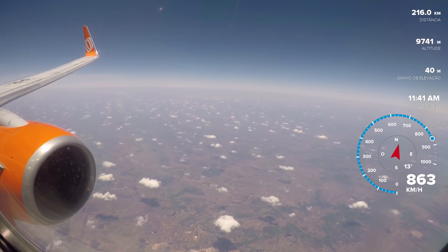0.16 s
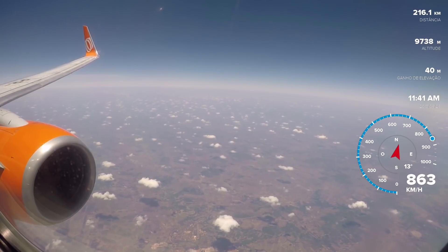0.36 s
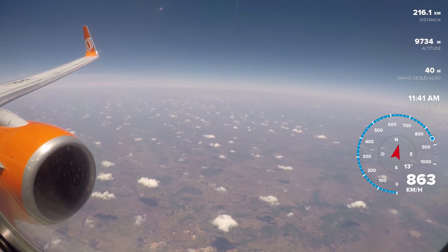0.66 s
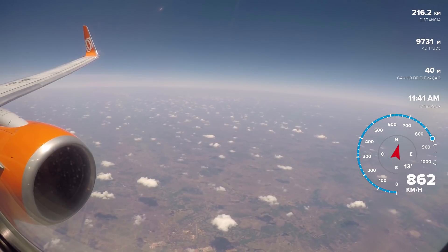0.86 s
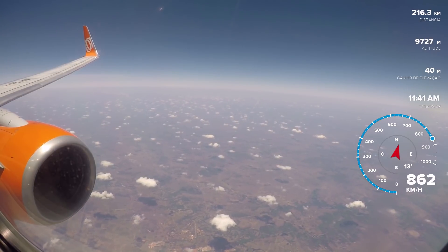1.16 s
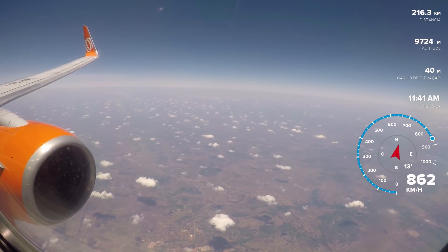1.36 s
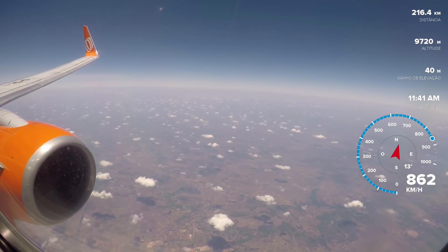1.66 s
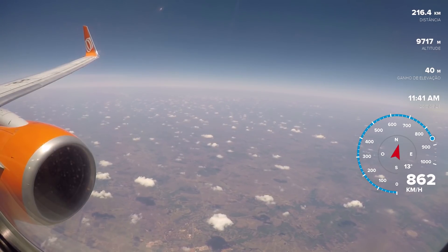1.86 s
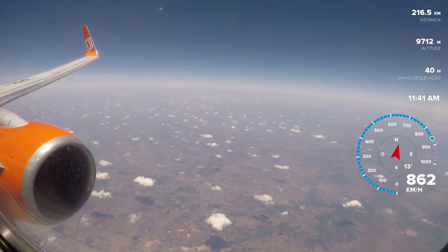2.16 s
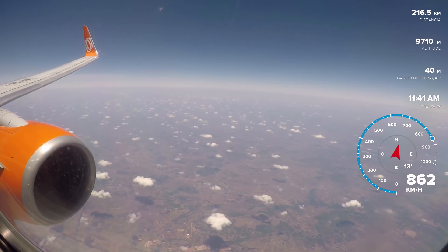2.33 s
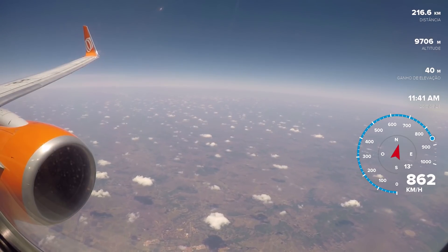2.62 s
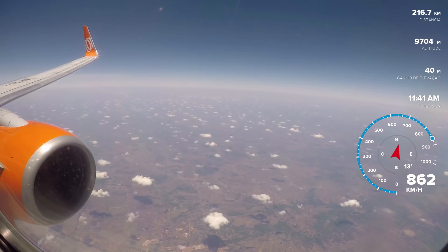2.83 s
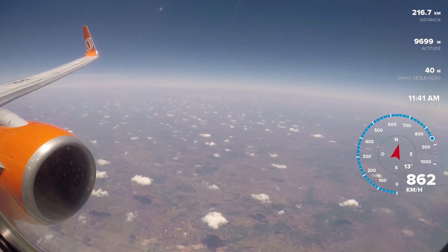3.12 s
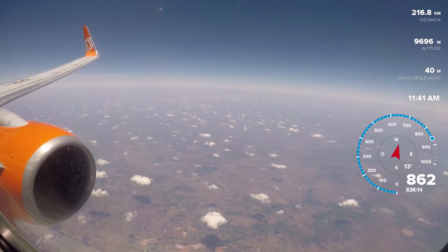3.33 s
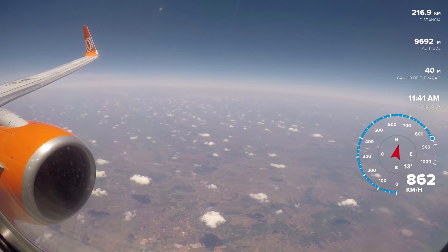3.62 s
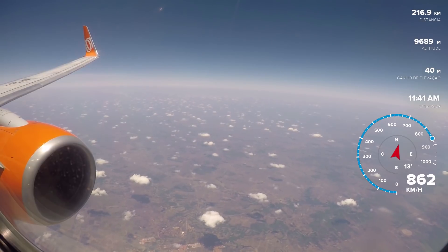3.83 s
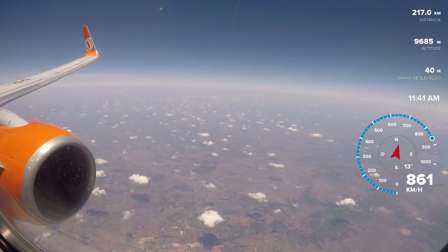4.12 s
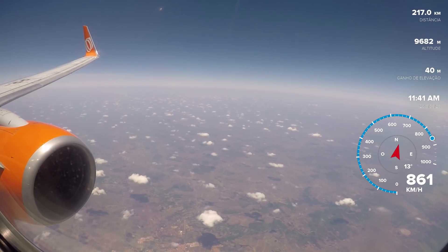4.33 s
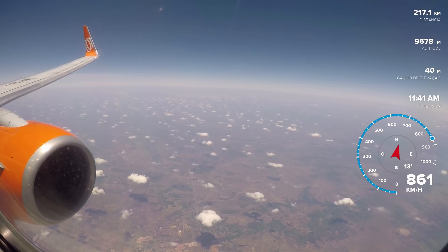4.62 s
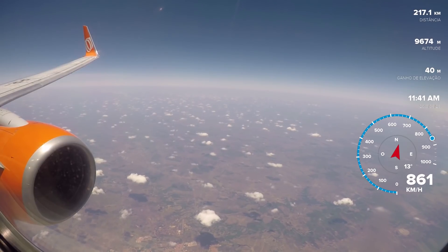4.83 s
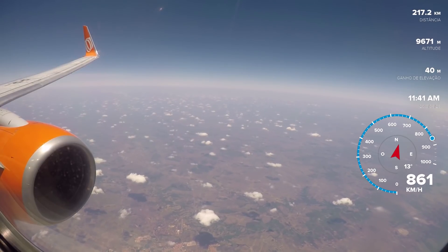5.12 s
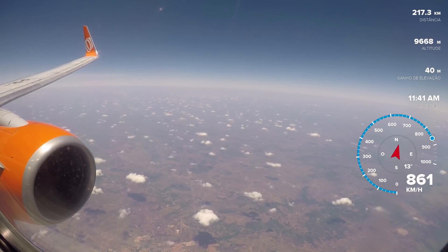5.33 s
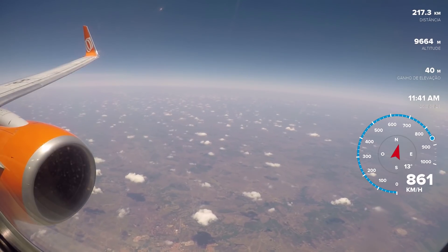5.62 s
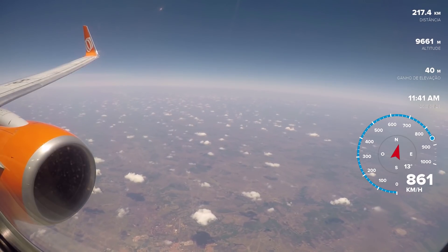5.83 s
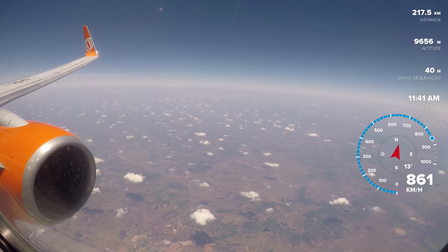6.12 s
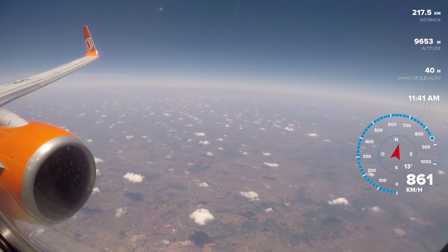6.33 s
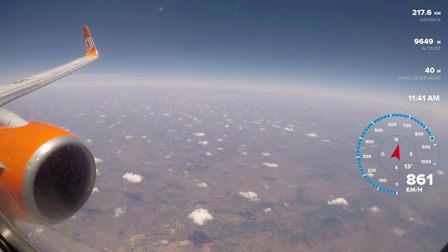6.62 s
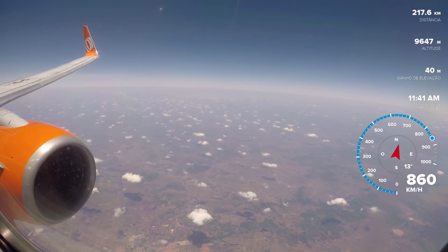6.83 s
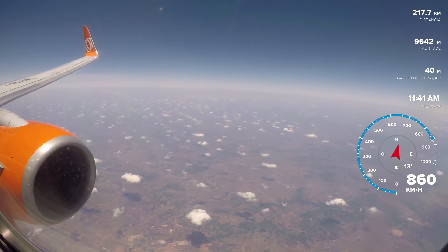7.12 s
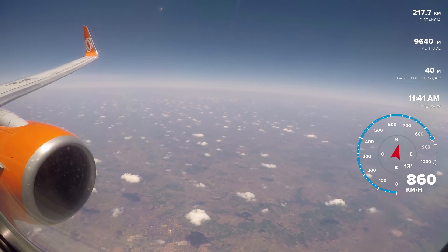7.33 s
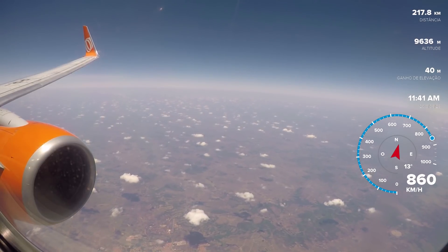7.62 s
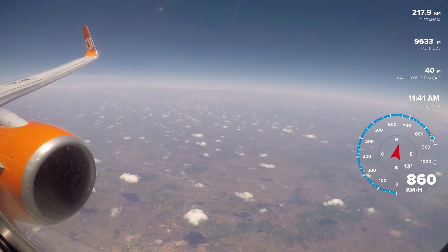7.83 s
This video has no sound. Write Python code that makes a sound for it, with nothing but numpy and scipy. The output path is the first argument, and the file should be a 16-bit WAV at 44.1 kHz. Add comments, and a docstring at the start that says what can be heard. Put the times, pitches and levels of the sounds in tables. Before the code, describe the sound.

Steady rush of air and jet engine drone with a deep hum, heard from a window seat inside a cruising airliner.

```python
"""Turbulent air rushes along the fuselage of a cruising jet airliner, heard from a window seat.
Its pressure fluctuations excite the resonances of the wall panels and the cabin air. Engine vibration
adds a deep steady hum, and engine roar booms in one cabin resonance as a surging drone. Close by, soft
material rustles a few times, a loose fitting clacks, and plastic trim gives one stick-slip squeak."""
import sys
import numpy as np
from scipy import signal
from scipy.fft import rfft, irfft
from scipy.io import wavfile

SR = 44100
rng = np.random.default_rng(int(sys.argv[2]) if len(sys.argv) > 2 else 0)


def log_audio(samples):
    """Write samples as a 16-bit WAV file to the path given in sys.argv[1]."""
    # one column per channel
    frames = np.atleast_2d(samples).T
    # limit to full scale, then quantise
    limited = np.clip(frames, -1, 1)
    pcm = np.round(limited * 32767).astype(np.int16)
    wavfile.write(sys.argv[1], SR, pcm)


N = 351458
TIME = np.arange(N) / SR
BIN_HZ = np.maximum(np.arange(N // 2 + 1) * SR / N, 1)

# Air rush transmitted through the wall. Each row: frequency in Hz, relative spectral density in dB.
RUSH_SPECTRUM = [(12, -55.5), (27, -46), (48, -45), (119, -48.5), (189, -48), (445, -60.5), (683, -61),
                 (853, -71.5), (1357, -68.5), (1962, -76), (2306, -76), (2869, -89.5), (6342, -101.6),
                 (7133, -106.3), (10300, -112.5), (11500, -124)]
# Peaks and dips in the tone colour of the air rush. Each row: frequency in Hz, bandwidth in Hz, lift in dB.
RUSH_PEAKS_AND_DIPS = [(43.6, 3.8, 6.5), (158.4, 11, 4.5), (174, 6.4, 0.5), (252.6, 16, 1.2), (348.5, 16, 6),
                       (382, 44, 3), (458, 23, -1), (510, 56, 3), (594.3, 45.4, 7.5), (710, 39, 1),
                       (743, 24, -3.5), (825, 121, 6), (1035, 130, 4), (2077, 54, 2.5), (2750, 64, 6),
                       (3760, 700, 2.5), (7600, 480, -1), (8400, 760, 3)]
# Harmonics of the hum. Each row: harmonic number, relative level in dB, spread of that level in dB.
HUM_HARMONICS = [(1, 0, .5), (2, -12, 2.5), (3, -21, 2)]
# Pitch contour of the drone. Each row: time in seconds, frequency in Hz.
DRONE_PITCH_CONTOUR = [(0, 144), (.5, 143), (.78, 156), (1.05, 141), (1.65, 145), (2.5, 139), (2.95, 150),
                       (3.55, 144), (3.85, 150), (4.0, 142), (4.35, 142), (5.0, 146), (5.55, 148),
                       (5.8, 140), (6.45, 142), (6.72, 156), (7.05, 141), (7.97, 145)]
# Level contour of the drone. Each row: time in seconds, relative level in dB.
DRONE_LEVEL_CONTOUR = [(0.0, -25), (0.24, -21.5), (0.35, -36), (0.86, -23), (0.98, -35.5), (1.02, -23),
                       (1.18, -33.5), (1.28, -23), (1.97, -29), (2.06, -23.5), (2.31, -29), (2.51, -20.5),
                       (2.57, -33.5), (2.62, -26.5), (3.17, -28), (3.37, -34), (3.4, -21.5), (3.73, -23.5),
                       (3.79, -37.5), (3.88, -21.5), (4.02, -30.5), (4.11, -19.5), (4.28, -27.5),
                       (4.53, -23.5), (4.71, -39.5), (4.73, -27), (5.97, -25), (6.02, -31), (6.17, -24),
                       (6.21, -32.5), (6.35, -21), (6.41, -27.5), (6.57, -22), (6.88, -33), (7.17, -21.5),
                       (7.41, -30), (7.61, -19), (7.81, -37), (7.86, -29), (7.97, -29)]
# Chirps of the squeak. Each row: start in seconds, length in seconds, pitch in Hz, relative level in dB,
# level of the octave above it in dB relative to the fundamental, roughness from 0 to 1.
SQUEAK_CHIRPS = [(6.558, 0.016, 3270, -51, -22, .15), (6.576, 0.017, 3230, -45.5, -17, .1),
                 (6.609, .018, 3250, -49, -22, .15), (6.635, .06, 3050, -57, -12, 1),
                 (6.712, 0.021, 3200, -57, -5, 0.3), (6.736, 0.023, 3200, -50, -8, .1),
                 (6.76, 0.034, 3230, -52.5, -7, .12), (6.794, 0.036, 3220, -53.5, -22, .15),
                 (6.832, .046, 3238, -49, -12, .12), (6.884, 0.03, 3270, -55, -5, .2),
                 (6.922, 0.02, 3350, -52, -13, 0.15), (6.945, .02, 3340, -58, -10, .4)]
# Impacts of the fitting. Each row: start in seconds, level in dB, attack and 1/e decay time in seconds.
FITTING_IMPACTS = [(5.590, -51, .002, .008), (5.597, -46.5, .006, 0.033)]
# Damped modes of the fitting. Each row: frequency in Hz, bandwidth in Hz, relative level in dB.
FITTING_RESONANCES = [(1900, 500, 5), (2600, 700, 5), (3650, 1000, 1), (5600, 900, -3), (6560, 650, -2),
                      (9200, 1000, -9), (11000, 1200, -14)]
# Rubs of soft material. Each row: start in seconds, level in dB, nominal length in seconds,
# centre of the hiss in Hz, bandwidth as a fraction of the centre.
RUSTLE_STROKES = [(0.126, -59, 0.049, 5900, 0.9), (0.578, -58, 0.034, 5500, 0.45),
                  (1.272, -55, .036, 4500, 0.6), (1.836, -55.8, .034, 5300, 1.6),
                  (2.062, -57, .034, 5300, 1.3), (2.954, -57, 0.024, 5300, 0.45),
                  (6.303, -60, .095, 5600, 0.61), (6.653, -58, 0.049, 4200, .8), (7.19, -63, .08, 6000, .9)]


def air_rush(level_db=-22, gust_db=0.25, flicker_db=0.43):
    """Boundary-layer turbulence forces panel and air resonances; each octave flutters as eddies pass."""
    hz, db = np.transpose(RUSH_SPECTRUM)
    spectrum_db = np.interp(np.log(BIN_HZ), np.log(hz), db)
    spectrum_db += sum(lift * resonance(centre, width) for centre, width, lift in RUSH_PEAKS_AND_DIPS)
    low_cut = BIN_HZ / np.hypot(BIN_HZ, 10)
    roar = rfft(noise(undb(spectrum_db) * low_cut))
    octave = np.floor(np.log2(np.maximum(BIN_HZ, 64)))
    rush = 0
    for k in np.unique(octave):
        band = irfft(roar * (octave == k), N)
        rush += band * undb(flicker_db * fluctuation(19))
    return rush * undb(level_db - gust_db * fluctuation(0.86))


def engine_hum(pitch_hz=32.57, fundamental_db=-25.3, drift=0.00079):
    """Forced vibration: the engine shakes the airframe at a nearly constant rate and its harmonics."""
    phase = phase_of(pitch_hz * (1 + drift * fluctuation(0.89)))
    hum = 0
    for k, db, waver_db in HUM_HARMONICS:
        amplitude = undb(db + waver_db * fluctuation(4.5))
        hum += amplitude * np.sin(k * phase + rng.uniform(0, 2 * np.pi))
    return np.sqrt(2) * hum * undb(fundamental_db)


def engine_drone(level_db=-27, wander=0.0252, drift=0.00798, surge_db=1.4, flutter_db=0.86):
    """A narrow cabin resonance filters engine roar into a tone of wandering pitch and surging level."""
    hz = np.interp(TIME, *np.transpose(DRONE_PITCH_CONTOUR))
    hz *= 1 + wander * fluctuation(15.5) + drift * fluctuation(2.75)
    contour_db = np.interp(TIME, *np.transpose(DRONE_LEVEL_CONTOUR))
    swell_db = surge_db * fluctuation(4.8) + flutter_db * fluctuation(15)
    drone = np.sin(phase_of(hz)) * undb(contour_db + swell_db)
    return unit_rms(drone) * undb(level_db)


def squeak(edge_s=0.012, rise_hz_per_s=430, jitter=0.04, gain_db=-0.6, flutter_db=0.5):
    """Stick-slip friction of plastic sounds a tone and its octave in chirps; irregular slip rasps."""
    slip = jitter * fluctuation(400)
    hz = np.full(N, float(SQUEAK_CHIRPS[0][2]))
    tone_envelope, octave_envelope = 0, 0
    for start, length, pitch, db, octave_db, roughness in SQUEAK_CHIRPS:
        age = TIME - start
        chirp_hz = (pitch + rise_hz_per_s * (age - length / 2)) * (1 + roughness * slip)
        takeover = np.clip(age / edge_s + 0.5, 0, 1)  # glide from the previous chirp's pitch
        hz += takeover * (chirp_hz - hz)
        grip = np.clip(np.minimum(age, length - age) / edge_s + 0.5, 0, 1)
        tone_envelope += grip * undb(db)
        octave_envelope += grip * undb(db + octave_db)
    octave_envelope *= undb(1.2 * fluctuation(45))
    phase = phase_of(hz)
    chirps = tone_envelope * np.sin(phase) + octave_envelope * np.sin(2 * phase)
    return np.sqrt(2) * chirps * undb(gain_db + flutter_db * fluctuation(50))


def fitting_clack():
    """Impact excitation: two quick bursts of dense contacts ring a plastic fitting's damped modes."""
    response = sum(undb(db) * resonance(hz, width) for hz, width, db in FITTING_RESONANCES)
    envelope = 0
    for start, db, attack, decay in FITTING_IMPACTS:
        age = np.maximum(TIME - start, 0)
        rise = np.minimum(age / attack, 1)
        fall = np.exp(-np.maximum(age - attack, 0) / decay)
        envelope += undb(db) * rise * fall
    return envelope * noise(response)


def rustles(grain_db=3, dull_hz=10000, settle_db=-23, settle_s=0.18, shuffle_floor_db=-82):
    """Sliding friction of cloth or wrapping makes grainy hisses, each settling into a faint shuffle."""
    grain = unit_rms(undb(grain_db * fluctuation(600)))
    softness = 1 / np.hypot(1, (BIN_HZ / dull_hz) ** 4)  # soft contact dulls the treble
    rubs, shuffle_power = 0, undb(shuffle_floor_db) ** 2
    for start, db, length, hz, width in RUSTLE_STROKES:
        age = np.maximum(TIME - start, 0)
        progress = age / (length / 2)  # 1 at the peak of the stroke
        stroke = progress * np.exp((1 - progress ** 2) / 2)
        hiss = noise(softness * resonance(hz, width * hz))  # heavy damping leaves one broad band
        rubs += undb(db) * stroke * grain * hiss
        settling = undb(db + settle_db) * np.minimum(progress, 1) * np.exp(-age / settle_s)
        shuffle_power += settling ** 2
    shuffle_envelope = np.sqrt(shuffle_power) * undb(1.2 * fluctuation(12))
    return rubs + shuffle_envelope * noise(resonance(hz=8600, width_hz=4000))


def undb(db):
    """Amplitude ratio of a level in decibels."""
    return 10 ** (np.asarray(db) / 20)


def unit_rms(x):
    """Normalisation to an rms of 1."""
    return x / np.sqrt(np.mean(x ** 2))


def phase_of(hz):
    """Phase in radians is the time integral of angular frequency."""
    return 2 * np.pi * np.cumsum(hz) / SR


def resonance(hz, width_hz):
    """Power response of a damped oscillator, 1 at its centre."""
    return 1 / (1 + ((BIN_HZ ** 2 - hz ** 2) / (BIN_HZ * width_hz)) ** 2)


def noise(gain):
    """White noise filtered by a gain at each frequency, scaled to an rms of 1."""
    return unit_rms(irfft(rfft(rng.standard_normal(N)) * gain, N))


def fluctuation(rate):
    """Low-pass noise of rms 1 that changes about rate times a second."""
    return noise(np.exp(-(BIN_HZ / (1 + rate)) ** 2))


def scene():
    """Superposition: the pressures of all sources add at the seat, in one channel."""
    return (air_rush() + engine_hum() + engine_drone() + rustles() + fitting_clack() + squeak())[None]


def record(dry):
    """A steep elliptic low-pass filter removes the treble above 11.2 kHz."""
    return signal.sosfilt(signal.ellip(8, 0.2, 70, 11200, fs=SR, output="sos"), dry)


dry = scene()
out = record(dry)
log_audio(out)
```